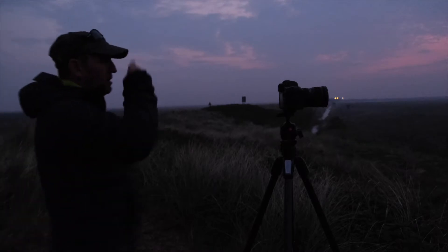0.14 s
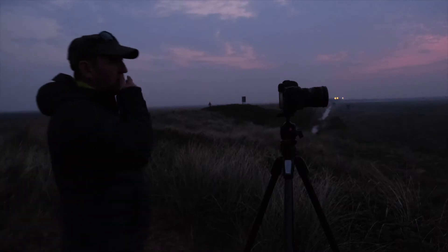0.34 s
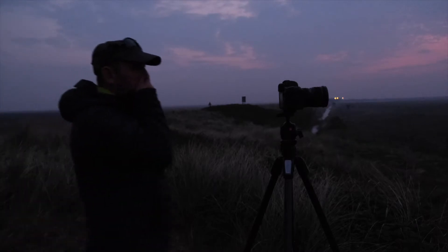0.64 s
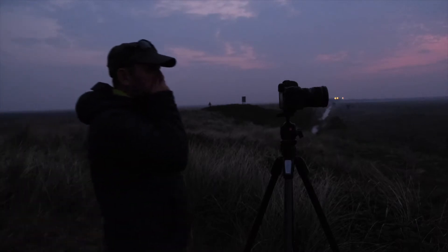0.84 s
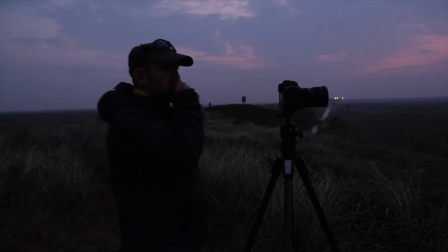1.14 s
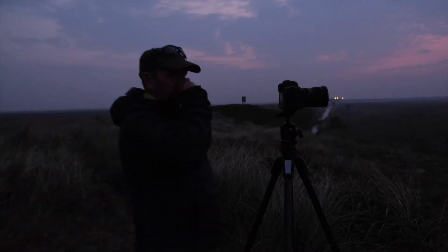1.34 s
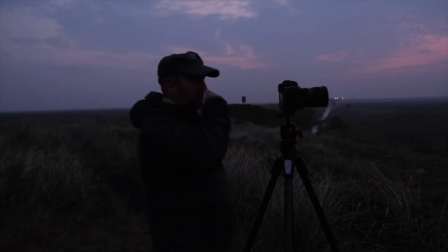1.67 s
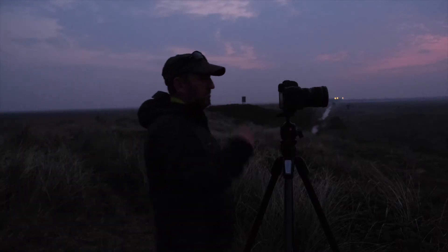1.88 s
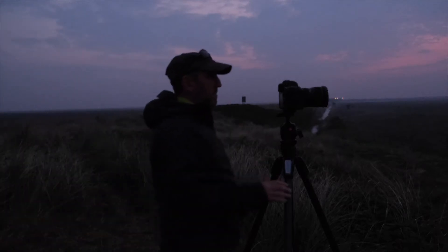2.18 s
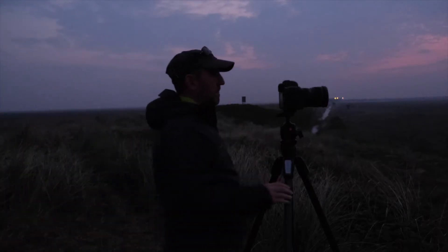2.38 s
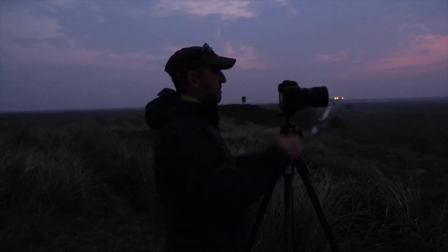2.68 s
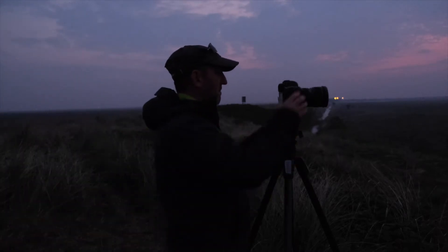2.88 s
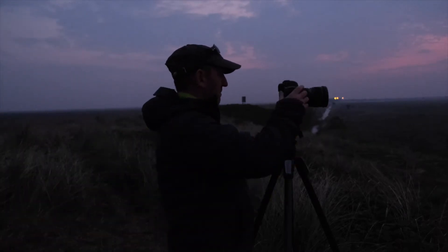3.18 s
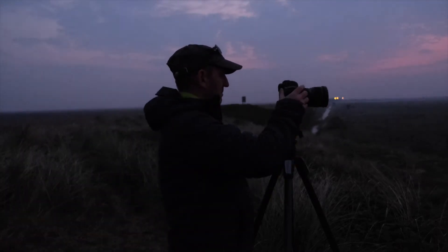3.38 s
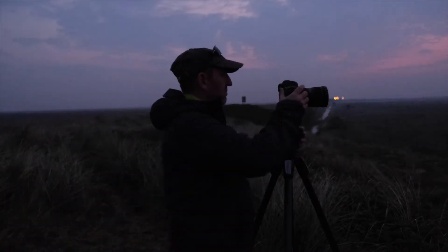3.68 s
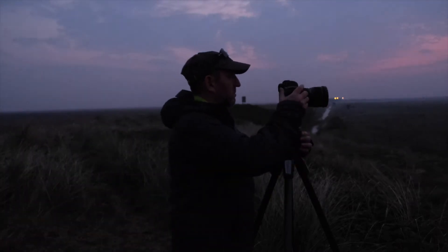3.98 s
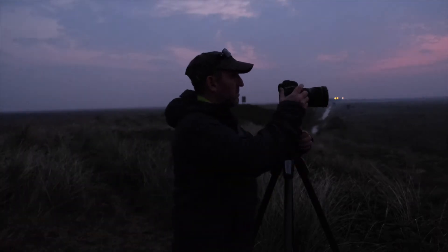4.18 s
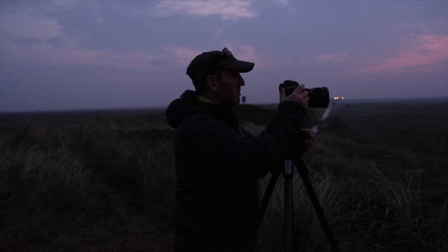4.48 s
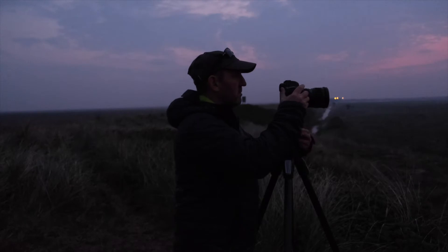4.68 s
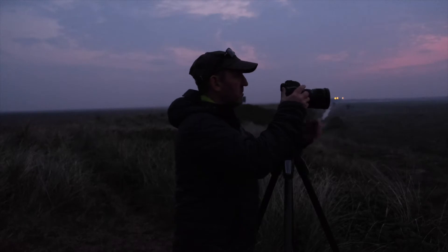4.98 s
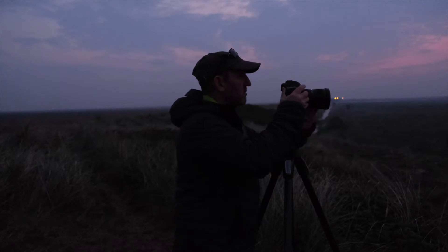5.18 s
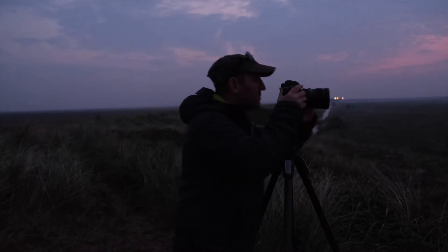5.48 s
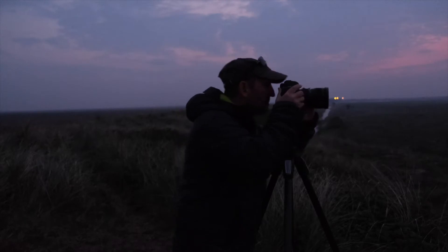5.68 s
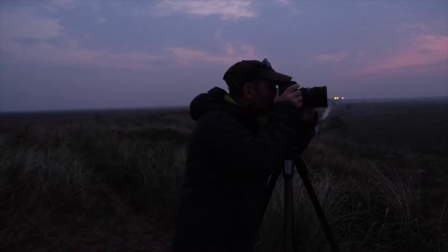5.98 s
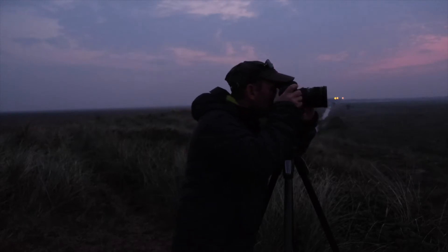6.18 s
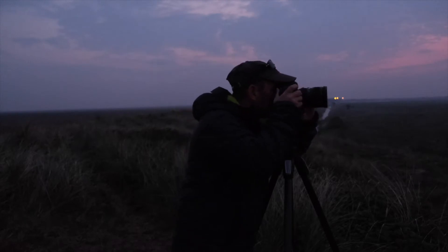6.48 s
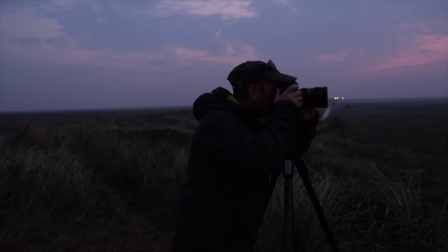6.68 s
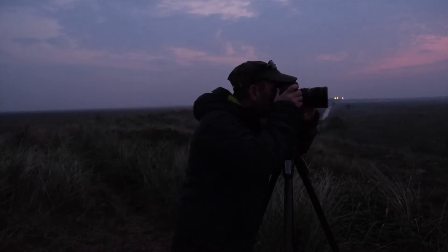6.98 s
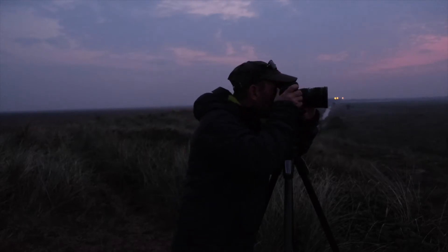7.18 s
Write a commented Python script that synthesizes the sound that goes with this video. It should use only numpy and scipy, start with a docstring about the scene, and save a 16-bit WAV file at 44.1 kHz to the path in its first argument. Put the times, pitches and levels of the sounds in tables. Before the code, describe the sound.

Many songbirds whistle, chip and twitter together in open dunes at dawn, with faint low cooing beneath them, a deep throbbing rumble and a soft wash like far surf. After about two seconds a light double knock touches the microphone housing and the sound turns quieter. Farther birds carry on with thin whistles, trills and short harsh chatter. The birds sit in the centre, with a wide hiss around them.

```python
"""Open dunes at dawn: near songbirds whistle, trill and chatter over a blur of far singers,
low cooing, a surf-like wash and a deep throbbing rumble. Bird notes are gliding syrinx tones;
harsh calls are bands of noise. Two knocks ring the housing, then the sound cuts to a quieter
spot with farther birds. The birds are in the centre; the hiss is wide."""
import sys
import numpy as np
from scipy import signal
from scipy.io import wavfile
from scipy.ndimage import uniform_filter1d

SR = 44100
rng = np.random.default_rng(int(sys.argv[2]) if len(sys.argv) > 2 else 0)


def generate_wav(signal):
    """Clip the signal to [-1, 1] and save it as 16-bit WAV at the path in sys.argv[1]."""
    frames = np.transpose(np.atleast_2d(signal))
    scaled = np.clip(frames, -1, 1) * 32767
    pcm = np.round(scaled).astype(np.int16)
    wavfile.write(sys.argv[1], SR, pcm)


N = 323694
CUT_S, EDGE_S = 2.218, 0.0058   # move to the quieter spot; half of a note's fade


def amp(db):
    return 10 ** (np.asarray(db) / 20)


def unit_rms(x):
    return x / np.sqrt(np.mean(x ** 2) + 1e-20)


def at_hz(points, hz):
    points_hz, values = np.array(points).T
    return np.interp(np.log(hz), np.log(points_hz), values)


def across_cut(before, after):
    """One value before the cut, another after a 13 ms crossfade."""
    return before + (after - before) * np.interp(np.arange(N) / SR, [CUT_S - .005, CUT_S + .0084], [0, 1])


def drift(rate_hz):
    """Random wander, RMS 1."""
    knots = rng.standard_normal(N // 100)
    return unit_rms(np.interp(np.arange(N) / SR * rate_hz, np.arange(len(knots)), knots))


def resonate(x, hz, width_hz):
    """Two-pole resonance, peak gain 1."""
    r = np.exp(-np.pi * width_hz / SR)
    gain = (1 - r * r) / 2
    return signal.lfilter([gain, 0, -gain], [1, -2 * r * np.cos(2 * np.pi * hz / SR), r * r], x)


def add(out, start_s, sound):
    i = max(round(start_s * SR), 0)
    sound = sound[i - round(start_s * SR):]
    out[i:i + len(sound)] += sound[:max(N - i, 0)]


def syrinx(times_s, hz, db, edge_s):
    """A sine gliding through the points, faded at both ends."""
    t = np.arange(times_s[0] - edge_s, times_s[-1] + edge_s, 1 / SR)
    pitch_hz = uniform_filter1d(np.interp(t, times_s, hz), size=60)
    fade = np.clip(np.minimum(t - t[0], t[-1] - t) / (2 * edge_s), 0, 1)
    envelope = amp(np.interp(t, times_s, db)) * np.sin(fade * np.pi / 2) ** 2
    return np.sqrt(2) * envelope * np.sin(2 * np.pi * np.cumsum(pitch_hz) / SR)


PROGRESS = np.linspace(0, 1, 41)   # position within a note


def note(length_s, pitch_hz, db, waver=.006):
    """An unsteady tone that swells and sinks; its highest part carries less well."""
    swell_db = -7 * np.abs(PROGRESS - .54)
    treble_loss_db = 5 * np.maximum(pitch_hz - 5530, 0) / 1000
    times_s = PROGRESS * length_s
    wander = 1 + waver * np.interp(times_s * 70, np.arange(30), rng.standard_normal(30))
    return syrinx(times_s, pitch_hz * wander, db + swell_db - treble_loss_db, EDGE_S)


def puff(length_s, hz, width_hz, db):
    """A swell of band noise."""
    size = round(length_s * SR)
    band = signal.butter(3, [hz - width_hz / 2, hz + width_hz / 2], "band", fs=SR, output="sos")
    noise = unit_rms(signal.sosfilt(band, rng.standard_normal(size + 1000)))[-size:]
    return amp(db) * noise * np.hanning(size)


# wash spectra before and after the cut: f/Hz, relative density/dB
WASH_BEFORE = [(35, -32.5), (50, -2.5), (70, -23.5), (230, -29), (410, -27), (1700, -35), (2400, -31),
               (4900, -28.5), (6200, -37.5), (9000, -50.5)]
WASH_AFTER = [(35, 0.5), (150, -15.5), (280, -9), (400, -16), (1500, -18), (2300, -15.5), (4700, -21),
              (6300, -26.5), (9000, -50)]
# stereo image of the wash: f/Hz, left-right correlation
WASH_CORRELATION = [(60, 1), (250, 0.83), (600, 0.74), (1200, 0.6), (2000, 1)]


def wash(before_db=-57.5, after_db=-64, waver_db=1.3):
    """Wind, surf and blurred song: third-octave bands of stereo noise, each wavering in level."""
    out, edges_hz = 0, 32 * 2 ** (np.arange(25) / 3)
    white = rng.standard_normal((2, 2, N))
    centres_hz = np.sqrt(edges_hz[1:] * edges_hz[:-1])
    shapes = [amp(at_hz(spectrum, centres_hz)) for spectrum in (WASH_BEFORE, WASH_AFTER)]
    before, after = (g / np.sqrt(np.sum(g ** 2 * np.diff(edges_hz)) * 2 / SR) for g in shapes)
    for k, hz in enumerate(centres_hz):
        band = signal.butter(2, edges_hz[k:k + 2], "band", fs=SR, output="sos")
        mid, side = signal.sosfilt(band, white[k % 2])
        alike = at_hz(WASH_CORRELATION, hz)
        stereo = np.sqrt((1 + alike) / 2) * mid + np.sqrt((1 - alike) / 2) * side * [[1], [-1]]
        gain = across_cut(before[k] * amp(before_db), after[k] * amp(after_db))
        out += gain * amp(waver_db * drift(9)) * stereo
    return out


# stand resonances: f/Hz, width/Hz, level before cut/dB, level after cut/dB
STAND_MODES = [(13, 5, -42, -72), (22, 5, -53, -69)]


def rumble():
    """The stand sways in the wind: noise in very low resonances."""
    out = 0
    for hz, width_hz, before_db, after_db in STAND_MODES:
        wind = rng.standard_normal(N + SR)
        sway = resonate(resonate(wind, hz, width_hz), hz, width_hz)[SR:]
        out += unit_rms(sway) * across_cut(amp(before_db), amp(after_db))
    return out


# spans of far song: start/s, end/s, usual top f/Hz, max level/dB
FAR_SONG = [(0, .7, 5000, -55), (.7, 2.2, 4800, -57), (2.2, 5.3, 4600, -63), (5.3, 7.3, 4200, -66)]


def far_singers(twitters_per_s=150):
    """Faint short twitters, each an arch or slur at a random pitch."""
    out = np.zeros(N)
    for start_s, end_s, top_hz, max_db in FAR_SONG:
        draws = rng.random((round(twitters_per_s * (end_s - start_s)), 7))
        for when, length, lowness, spread, rise, fall, faintness in draws:
            hz = top_hz * 2 ** (.4 * spread - .1 - 1.3 * lowness ** 2)
            times_s = np.arange(3) * (.004 + .03 * length ** 5)
            arch_hz = hz * np.array([1 - .3 * rise ** 3, 1, 1 - .3 * fall ** 3])
            db = max_db - 15 * np.sqrt(faintness) - 5 * length ** 2 - 4 * lowness ** 2
            twitter = syrinx(times_s, arch_hz, [db] * 3, edge_s=.00424)
            add(out, start_s + when * (end_s - start_s), twitter)
    return out


# noisy calls: mid t/s, length/s, centre f/Hz, level/dB
RASP_CALLS = [(0.1, 1.58, 4640, -58), (0.481, 0.94, 428, -66.5), (1.432, 0.05, 2120, -62),
              (3.371, 0.14, 4570, -63), (4.455, 0.062, 5660, -65), (6.444, 0.092, 4900, -65.5)]


def rasps():
    """Raspy calls, blurred song and a murmur of coos: one noise swell each."""
    out = np.zeros(N)
    for mid_s, length_s, hz, db in RASP_CALLS:
        add(out, mid_s - length_s / 2, puff(length_s, hz, .34 * hz, db))
    return out


# cooed notes: t/s, length/s, first f/Hz, last f/Hz, level/dB
COO_NOTES = [(0.171, 0.047, 427, 398, -57.5), (.36, 0.25, 485, 421.5, -65.5),
             (0.707, 0.077, 460, 390, -63.5), (1.415, 0.28, 410, 415, -66.5), (1.228, 0.127, 416, 394, -68),
             (1.332, 0.19, 593, 512, -74), (1.708, 0.22, 582, 443, -72)]


def coos():
    """Low wavering glides."""
    out = np.zeros(N)
    for start_s, length_s, first_hz, last_hz, db in COO_NOTES:
        pitch_hz = first_hz + (last_hz - first_hz) * PROGRESS
        add(out, start_s - EDGE_S, note(length_s, pitch_hz, db, waver=.03))
    return out


# whistled notes: t/s, length/s, first f/Hz, last f/Hz, mid-note bulge/Hz, level/dB
WHISTLE_NOTES = [ (0.174, 0.059, 5790, 5590, 8, -54), (0.294, 0.029, 5270, 4840, 1, -53),
                 (0.399, 0.03, 5120, 4500, 118, -45), (0.478, 0.038, 5010, 2880, 157, -54),
                 (0.568, 0.068, 2870, 3760, 154, -58.5), (0.632, 0.015, 5900, 5300, -2, -50),
                 (0.678, .009, 5700, 5550, 50, -53), (0.762, 0.011, 4450, 5350, 198, -47.5),
                 (0.772, 0.082, 5570, 4370, 140, -42.5), (0.783, 0.13, 6530, 6680, -18, -50.5),
                 (0.998, 0.041, 3420, 4620, -2, -54.5), (1.005, 0.054, 5710, 5900, 48, -54.5),
                 (1.057, 0.03, 6200, 4830, -10, -54.5), (1.127, 0.028, 2600, 2445, 8, -54),
                 (1.161, 0.11, 2820, 4070, -300, -61.5), (1.234, 0.009, 5300, 4850, -50, -43.5),
                 (1.292, 0.04, 6030, 6170, -60, -36.5), (1.389, 0.032, 4400, 5100, -52, -45.5),
                 (1.421, 0.019, 3900, 3900, 806, -46), (1.458, .02, 3370, 3300, -3, -59),
                 (1.52, 0.012, 3870, 3900, 0, -52), (1.528, 0.0076, 4730, 6900, 0, -46),
                 (1.538, 0.041, 6400, 4290, 298, -40.5), (1.583, 0.03, 4400, 4270, 402, -42),
                 (1.651, 0.016, 4880, 4800, -2, -51.5), (1.704, 0.02, 4900, 5000, 2, -52),
                 (1.841, 0.035, 6120, 7260, 500, -56), (1.939, 0.07, 6050, 6056, -190, -44),
                 (1.998, 0.053, 6000, 5260, 48, -41.5), (1.979, 0.036, 2604, 2550, 32, -62),
                 (2.388, 0.075, 4420, 3600, 9, -63.5), (2.537, 0.22, 4690, 5230, -37, -65.5),
                 (2.851, 0.055, 2460, 2475, 150, -61), (2.916, 0.098, 2006, 2300, 73, -63.5),
                 (2.929, 0.056, 5840, 5360, 2152, -53.5), (4.421, 0.2, 2217, 2240, -3, -76),
                 (3.265, 0.068, 2186, 1990, 225, -64.5), (3.295, 0.18, 2497, 2654, 0, -68),
                 (3.31, 0.19, 4180, 4900, -130, -67), (3.42, 0.068, 8460, 6340, -150, -58.5),
                 (3.485, 0.17, 6060, 3980, -58.5, -53.5), (3.493, 0.096, 7360, 5200, 190, -63),
                 (3.563, 0.089, 5490, 5680, -8, -59.5), (3.71, 0.073, 4020, 3730, -67, -62),
                 (3.783, 0.5, 4700, 5330, 112, -71.5), (3.815, 0.072, 2630, 2746, -2, -66),
                 (3.881, 0.23, 2085, 1985, 5.5, -64.5), (3.896, 0.053, 4090, 3940, -96, -61),
                 (4.028, 0.087, 4230, 4210, 108, -62), (4.188, 0.076, 2130, 2180, 133, -59),
                 (4.277, 0.11, 2115, 2250, 39, -57.5), (4.524, 0.17, 8080, 7000, 143, -63),
                 (4.65, 0.078, 2090, 1970, 5, -63.5), (4.69, 0.32, 4190, 4850, 200.5, -69.5),
                 (4.757, 0.11, 2420, 2240, 5, -69.5), (4.821, 0.12, 1934, 1877, 172, -62.5),
                 (4.974, 0.1, 2470, 2550, 108, -65.5), (5.1, 0.19, 4780, 5220, -40, -69),
                 (5.293, 0.035, 5200, 3950, -150, -67), (5.36, 0.16, 1926, 2090, 136, -67),
                 (5.606, 0.053, 2300, 2244, -2, -67), (5.944, 0.11, 4430, 4640, -110, -73),
                 (6.06, 0.16, 4460, 4920, 91, -69.5), (6.032, 0.082, 2420, 2510, 107, -68),
                 (6.227, 0.085, 4680, 3550, 5, -67), (6.414, 0.16, 4580, 5230, 0, -70), ]


def whistles():
    """Near notes glide on a bowed pitch path."""
    out = np.zeros(N)
    for start_s, length_s, first_hz, last_hz, bulge_hz, db in WHISTLE_NOTES:
        glide_hz = first_hz + (last_hz - first_hz) * PROGRESS
        bow_hz = bulge_hz * (1 - (2 * PROGRESS - 1) ** 2)
        add(out, start_s - EDGE_S, note(length_s, glide_hz + bow_hz, db))
    return out


# hooked chips: t/s, hold/s, held f/Hz, base level/dB
HOOK_CHIPS = [(0.65, 0.013, 4840, -41), (0.692, 0.014, 4840, -42.5), (1.24, 0.028, 5095, -41.5)]


def hooks(spike_s=.008, edge_s=EDGE_S / 2):
    """Pitch spikes, falls back and settles on a short held note."""
    out = np.zeros(N)
    pitch_ratios = np.array([.95, 1.16, .95, 1, 1])
    contour_db = -3 * np.array([.67, 1.6, 2, .26, .22])
    for start_s, hold_s, hz, db in HOOK_CHIPS:
        times_s = [0, spike_s / 2, spike_s, spike_s + hold_s / 2, spike_s + hold_s]
        add(out, start_s - edge_s, syrinx(times_s, hz * pitch_ratios, db + contour_db, edge_s))
    return out


# rising flicks, upper voice: t/s, length/s, first f/Hz, level/dB
FLICK_NOTES = [(1.66, 0.028, 4220, -54.5), (1.803, 0.018, 4280, -55.5), (1.949, 0.015, 4200, -58),
               (2.119, 0.021, 4270, -56), (2.3, 0.02, 4160, -58.5), (2.463, 0.022, 4050, -60),
               (4.7, 0.03, 4580, -60.5), (4.951, 0.032, 4450, -63), (5.223, 0.033, 4580, -65)]


def flicks(rise_hz_per_s=45000, lower_ratio=.82, lower_db=-3):
    """One bird repeats a quick upsweep in two voices."""
    out = np.zeros(N)
    for start_s, length_s, first_hz, db in FLICK_NOTES:
        pitch_hz = first_hz + rise_hz_per_s * length_s * PROGRESS
        upper = note(length_s, pitch_hz, db)
        lower = note(length_s, pitch_hz * lower_ratio, db + lower_db)
        add(out, start_s - EDGE_S, upper + lower)
    return out


# taps on the housing: t/s, base level/dB
TAPS = [(2.17, -43.5), (2.19, -47)]
# housing modes: f/Hz, gain/dB, T60/s
HOUSING_MODES = [(187, -1, 0.35), (360, 5.5, 0.032), (866, 5, 0.037), (1184, 15, 0.02)]


def knocks():
    """Soft taps ring the housing; the cut ends the ring."""
    out, t = np.zeros(N), np.arange(SR // 5) / SR
    for start_s, db in TAPS:
        for hz, mode_db, t60_s in HOUSING_MODES:
            add(out, start_s, amp(db + mode_db - 60 * t / t60_s) * np.sin(2 * np.pi * hz * t))
    return uniform_filter1d(out, size=20) * across_cut(.6, 0)


# climbing calls: t/s, level/dB
CLIMB_CALLS = [(2.38, -68), (2.5, -71), (6.019, -70), (6.387, -68), (6.768, -68)]


def climbs(length_s=.19, from_hz=3300, to_hz=4400, settle_s=.03):
    """One bird repeats a long call that climbs fast and levels off."""
    out = np.zeros(N)
    pitch_hz = to_hz + (from_hz - to_hz) * np.exp(-PROGRESS * length_s / settle_s)
    for start_s, db in CLIMB_CALLS:
        add(out, start_s - EDGE_S, note(length_s, pitch_hz, db))
    return out


# chatter runs: first t/s, last t/s, base level/dB
CHATTER_RUNS = [(2.635, 2.69, -56), (2.819, 2.874, -56), (2.997, 3.053, -57), (3.212, 3.27, -54),
                (5.044, 5.082, -58), (5.547, 5.6, -56), (5.831, 5.884, -55), (6.565, 6.638, -58),
                (6.857, 6.911, -59), (7.1, 7.155, -56.5)]


def chatter(pulses_per_s=54, pulse_s=.015, width_hz=1300, step_hz=200):
    """Harsh swelling runs of noise pulses, each at a slightly different pitch."""
    out = np.zeros(N)
    for first_s, last_s, db in CHATTER_RUNS:
        times_s = np.linspace(first_s, last_s, round((last_s - first_s) * pulses_per_s) + 1)
        for mid_s, swell in zip(times_s, np.hanning(len(times_s) + 2)[1:]):
            hz = rng.normal(4500, 150)
            pulse_db = db + 5 * (swell - 1)
            narrow = puff(pulse_s, hz - step_hz, width_hz, pulse_db - 1)
            wide = puff(pulse_s, hz - 2 * step_hz, 2 * width_hz, pulse_db - 2)
            add(out, mid_s - pulse_s / 2, narrow + wide)
    return out


# trill runs: first t/s, last t/s, chirp rate/Hz, first f/Hz, last f/Hz, upsweep/Hz, level/dB
TRILL_RUNS = [(4.052, 4.291, 50, 6200, 7350, 600, -70), (4.2, 4.36, 56, 4850, 4600, 100, -65),
              (4.153, 4.5, 25.5, 3450, 3500, 500, -64), (4.48, 4.66, 110, 4500, 3900, 900, -69),
              (5.508, 5.82, 25.5, 3450, 3500, 600, -65), (2.88, 3.115, 25.5, 3500, 3500, 600, -65),
              (5.25, 7.26, 17.4, 1350, 1350, 300, -69)]


def trills(chirp_s=.008):
    """Evenly spaced upward chirps; the pitch walks along the run."""
    out = np.zeros(N)
    for first_s, last_s, rate_hz, first_hz, last_hz, sweep_hz, db in TRILL_RUNS:
        for end_s in np.linspace(first_s, last_s, round((last_s - first_s) * rate_hz) + 1):
            hz = first_hz + (last_hz - first_hz) * np.sqrt((end_s - first_s) / (last_s - first_s))
            chirp = syrinx([0, chirp_s], [hz - sweep_hz / 2, hz + sweep_hz / 2], [db, db], chirp_s / 2)
            add(out, end_s - chirp_s, chirp)
    return out


def moving_air(x):
    """Moving air flutters and roughens the notes."""
    flutter_db = across_cut(2, 1.8) * drift(40)
    roughness_db = 2 * drift(150)
    return x * amp(flutter_db + roughness_db)


def dunes(x, wet_db, t60_s=.3):
    """Scrub and slopes scatter back a short noisy tail."""
    t = np.arange(SR // 2) / SR
    tail = rng.standard_normal(len(t)) * amp(-60 * t / t60_s)
    return x + amp(wet_db) * signal.fftconvolve(x, tail / np.linalg.norm(tail))[:N]


def scene():
    notes = moving_air(whistles() + climbs() + flicks() + coos())
    near = dunes(notes + hooks(), wet_db=across_cut(-17, -5))
    far = dunes(trills() + chatter() + rasps() + far_singers(), wet_db=-5)
    return near + far + knocks() + rumble() + wash()


def record(dry, whine_hz=15704, whine_db=-86, cutoff_hz=16050):
    """A faint electronic whine, and hiss that is mostly separate per channel; the top is cut."""
    white = rng.standard_normal((2, N)) + .3 * rng.standard_normal(N)
    highpass = signal.butter(2, 5000, "high", fs=SR, output="sos")
    hiss = signal.sosfilt(highpass, white) * across_cut(amp(-64.5), amp(-67))
    whine = amp(whine_db) * np.sqrt(2) * np.sin(2 * np.pi * whine_hz * np.arange(N) / SR)
    lowpass = signal.cheby2(24, 50, cutoff_hz, fs=SR, output="sos")
    return signal.sosfilt(lowpass, dry + hiss + whine)


dry = scene()
out = record(dry)
generate_wav(out)
```